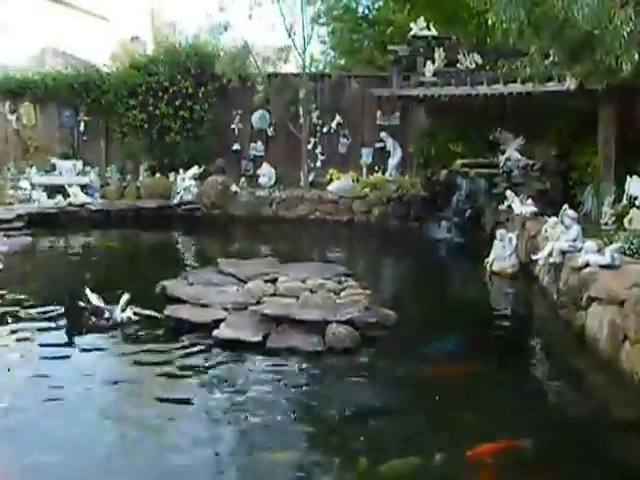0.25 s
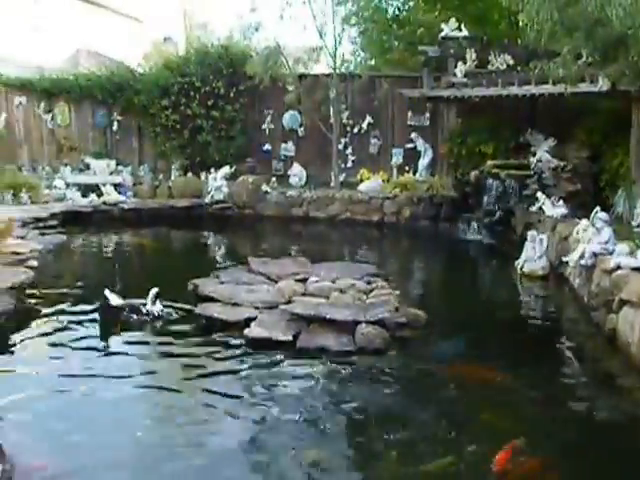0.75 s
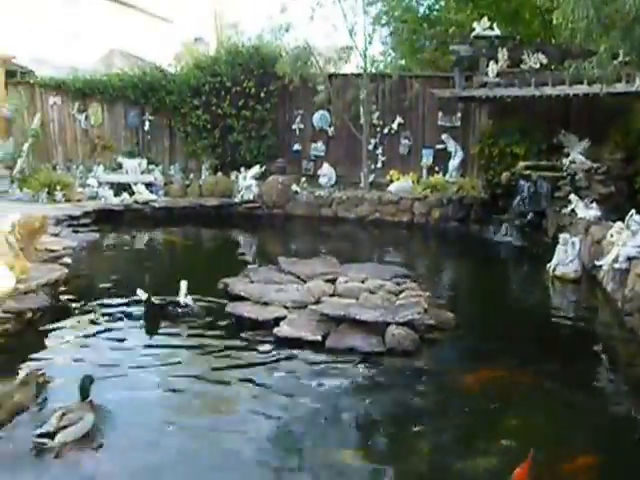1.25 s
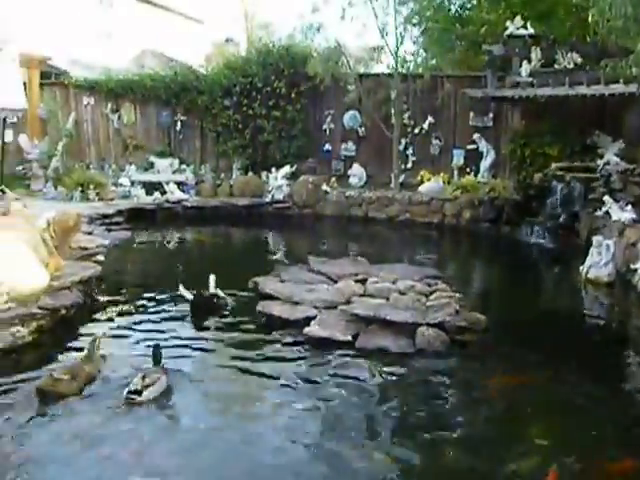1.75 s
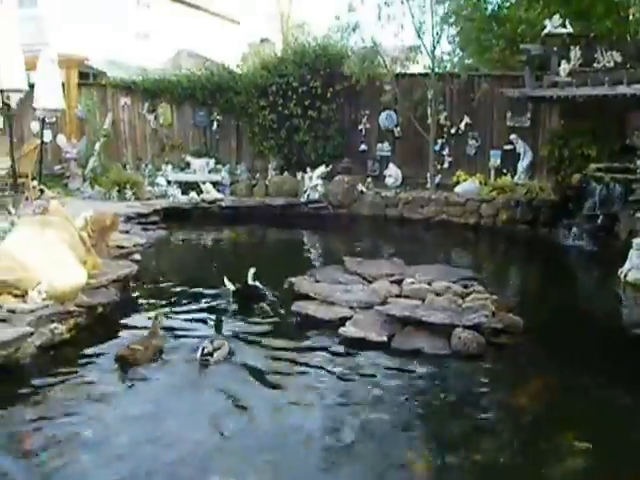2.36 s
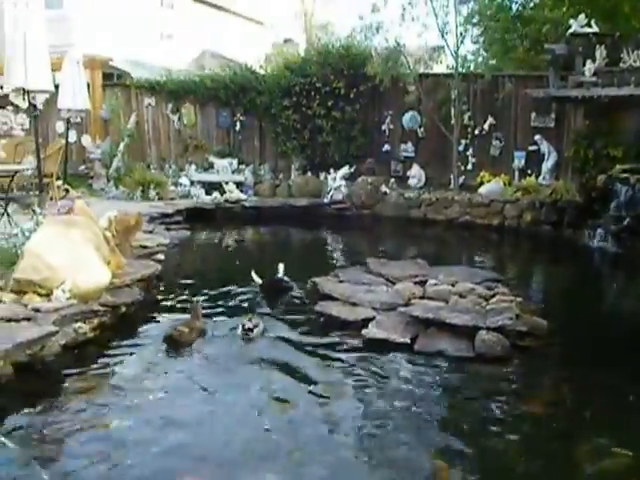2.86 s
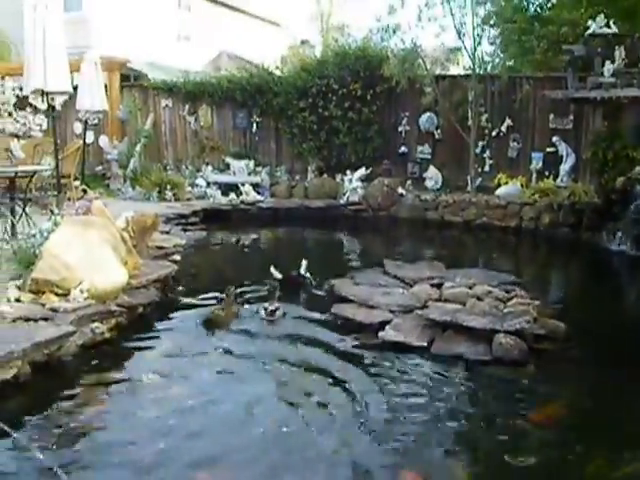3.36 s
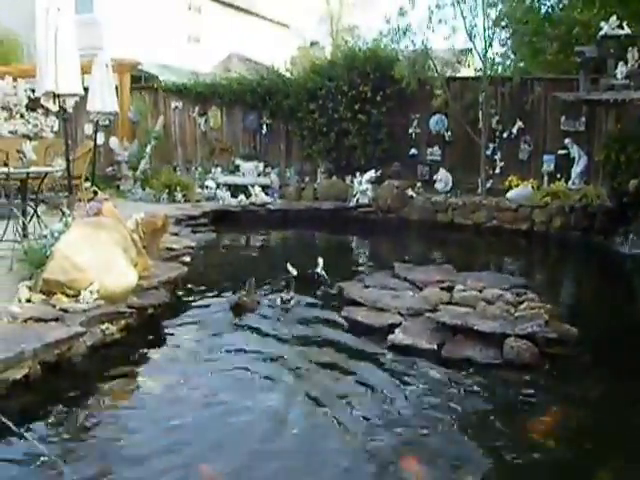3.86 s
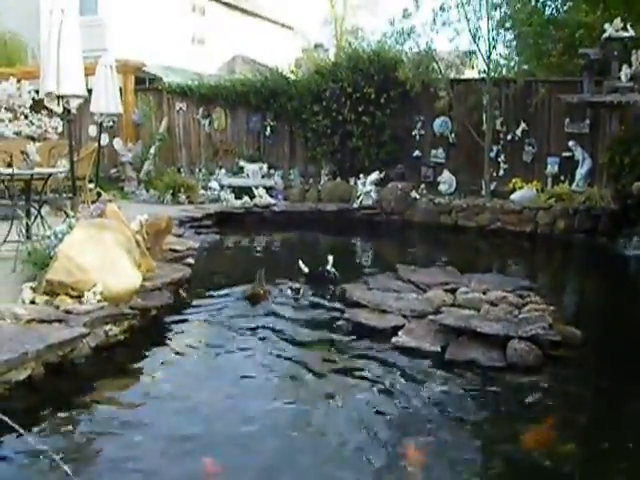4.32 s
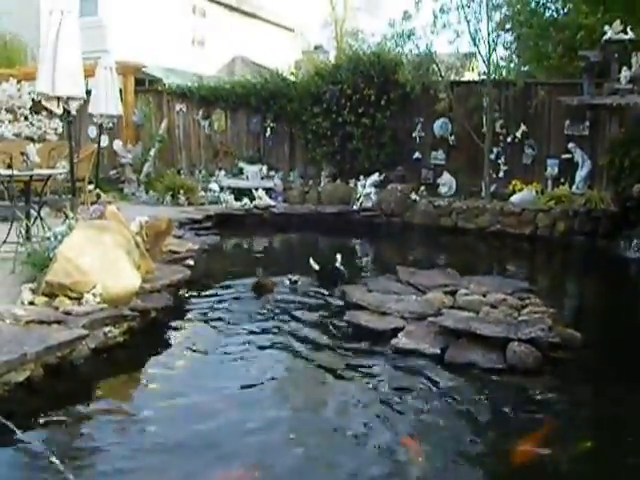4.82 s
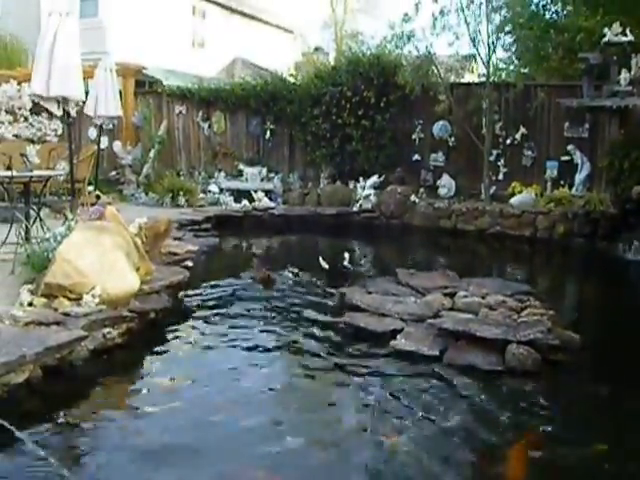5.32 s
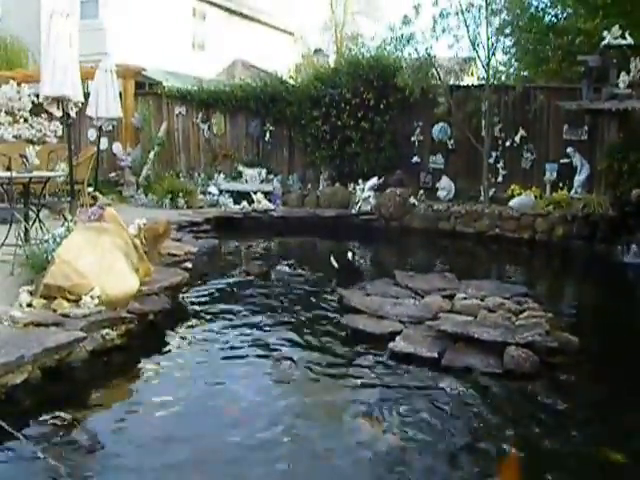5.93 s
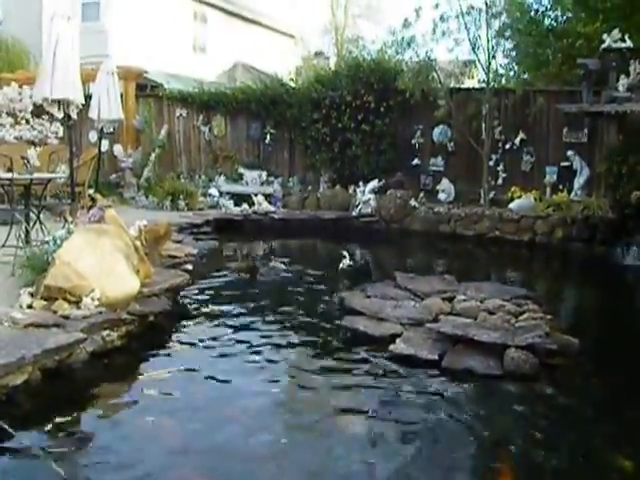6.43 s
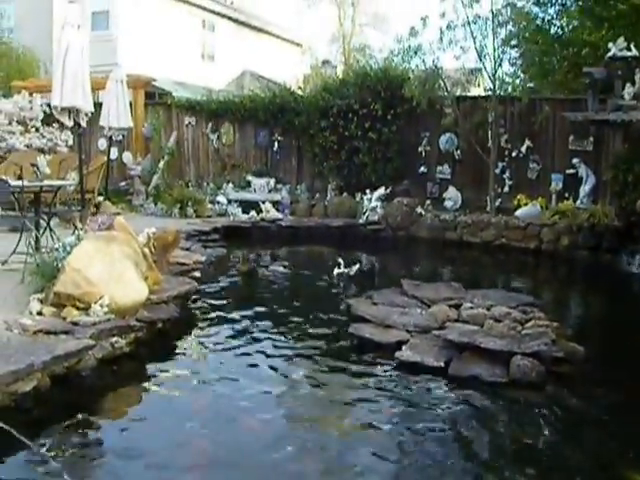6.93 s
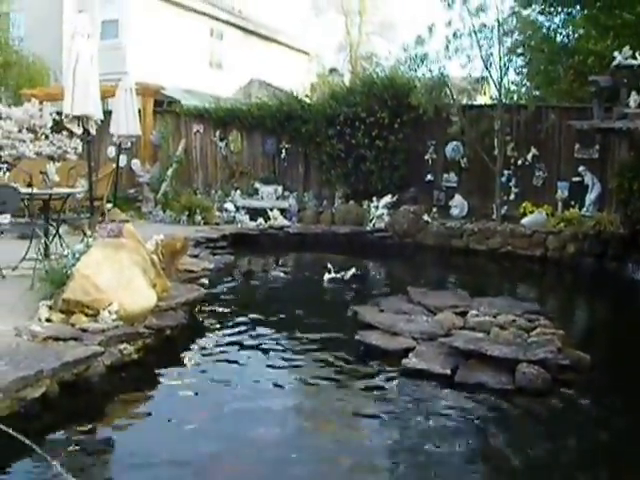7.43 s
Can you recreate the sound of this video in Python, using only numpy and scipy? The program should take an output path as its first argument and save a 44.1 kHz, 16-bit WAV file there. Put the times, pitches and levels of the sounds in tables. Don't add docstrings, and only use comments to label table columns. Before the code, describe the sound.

For about 7.7 seconds a small waterfall splashes continuously into a garden pond, heard outdoors through a small camera microphone. The water is a dense, bright wash of spray and rapid bubbling, strewn with crisp ticks, clear ringing drips and tiny high spits, plus soft low plops every few tenths of a second. It starts strongest, dips within the first quarter second, and settles slightly quieter and less fizzy after 3 seconds. A very faint low pump hum lies beneath, fading out after 5. At about 5.25 a duck quacks softly, nasal and buzzing, rising from a growl; at 6.15 a second quack is higher and more open; at 7.25 a third is rougher and broken off. A small gurgle climbs near 7.0. A barely audible distant engine drones from about 6.5. Short echoes return from stones and fence.

```python
import sys
import numpy as np
from scipy import signal
from scipy.fft import rfft, irfft
from scipy.io import wavfile
from scipy.ndimage import uniform_filter1d

SR = 44100
rng = np.random.default_rng(int(sys.argv[2]) if len(sys.argv) > 2 else 0)


def digitize_waveform(pressure):
    field = np.atleast_2d(pressure).T
    bounded = np.clip(field, -1, 1)
    quanta = np.round(bounded * 32767).astype(np.int16)
    wavfile.write(sys.argv[1], SR, quanta)


def how_loud(loudness_db):
    steps = np.asarray(loudness_db, float) / 20
    return 10 ** steps


N = 338688
YARD_DB = -12
NOTCH_HZ = 7870
LOW_TICK_DB = -12


def evened(x):
    return x / np.sqrt(np.mean(x ** 2) + 1e-20)


def steadied(x, window_s):
    width = int(window_s * SR)
    power = uniform_filter1d(uniform_filter1d(x ** 2, width), width)
    return x / np.sqrt(power)


def add(mix, start_s, sound):
    part = mix[round(start_s * SR):][:len(sound)]
    part += sound[:len(part)]


def coloured(x, points):
    hz, db = np.transpose(points)
    f = np.fft.rfftfreq(len(x), 1 / SR)
    gain = how_loud(np.interp(np.log(f + 1), np.log(hz), db))
    return irfft(rfft(x) * gain, len(x))


def wander(rate_hz, size=N):
    width = int(SR / rate_hz)
    return evened(uniform_filter1d(uniform_filter1d(rng.standard_normal(size), width), width))


def bubble(hz, cycles, rise):
    u = np.arange(int(1.9 * cycles * SR / hz)) * hz / SR
    shape = (1 - np.exp(-u / 0.38)) ** 2 * np.exp(-3 * u / cycles)
    turns = u + rise * u ** 2 / (2 * cycles)
    return shape / shape.max() * np.sin(2 * np.pi * turns)


def tick(noise, decay_s):
    burst = (noise[2:] - noise[:-2]) * np.exp(-np.arange(len(noise) - 2) / SR / decay_s)
    return burst / abs(burst).max()


def splashed(sound, noise, splash_db, decay_s):
    trail = noise ** 3 * np.exp(-np.arange(len(noise)) / SR / decay_s)
    trail *= how_loud(splash_db) / np.linalg.norm(trail)
    trail[0] = 1
    return np.convolve(sound, trail)


def nearby(x, tail_db):
    # delay_s, level_db
    stones = [
        (.0058, -26.5),
        (.0097, -24),
    ]
    yard_t60_s = 0.25
    at = np.arange(400, SR // 2, 20)
    room = np.zeros(SR // 2 + 20)
    fade = how_loud(-60 * at / SR / yard_t60_s)
    room[at + rng.integers(0, 20, len(at))] = rng.choice([-1., 1.], len(at)) * fade
    room *= how_loud(tail_db) / np.linalg.norm(room)
    room[0] = 1
    for delay_s, level_db in stones:
        room[round(delay_s * SR)] += how_loud(level_db)
    return signal.oaconvolve(x, room)[:N]


def spray(patchy_db, gust_db):
    frames = N // 64 + 5
    a, b, patches = rng.standard_normal((frames, 129, 3)).T
    patches = evened(uniform_filter1d(uniform_filter1d(patches, 12, 0), 14, 1))
    share = np.clip(np.fft.rfftfreq(256, 1 / SR)[:, None] / 3000 - .3, 0, 1)
    gusts = share * wander(120.0, size=64 * frames)[::64]
    bands = (a + 1j * b) * how_loud(patchy_db * patches + gust_db * gusts)
    return evened(signal.istft(bands, nperseg=256, noverlap=192)[1][:N])


def strikes(per_s, spread_db, clump):
    size = how_loud(spread_db * np.minimum(rng.exponential(1, N), 3.1))
    return size * (rng.random(N) < per_s / SR * clump)


def patter():
    bubbles_per_s, ticks_per_s = 1200, 300
    bubbles_db, ticks_db = -0.5, -4
    clump = np.exp(1.8 * np.tanh(0.65 * wander(110.)))
    clump /= clump.mean()
    clumped = strikes(bubbles_per_s, 7.44, clump)
    even = strikes(bubbles_per_s, 4.1, 1)
    kind = rng.integers(0, 48, N)
    pitch_hz = np.linspace(np.sqrt(300), np.sqrt(15000), 48) ** 2
    bubbles, ticks = np.zeros(N), np.zeros(N)
    for k, hz in enumerate(pitch_hz):
        one = bubble(hz, 6.3 * rng.uniform(0.59, 1.96), 0.29)
        contact = tick(rng.standard_normal(len(one) + 2), 0.00021)
        one = one + how_loud(-1.5) * min(hz / 3000, 1) * contact
        one = splashed(one, rng.standard_normal(900), splash_db=-3.5, decay_s=0.0016)
        one *= hz ** 0.24 / np.linalg.norm(one)
        size = clumped if k > 8 else even
        bubbles += signal.oaconvolve(size * (kind == k), one)[:N]
    size = strikes(ticks_per_s, 11.0, clump)
    for k in range(16):
        one = rng.standard_normal(200) * np.exp(-np.arange(200) / SR / 0.00053)
        one = signal.lfilter([1, -.5 - k / 32], [1], one)
        one = splashed(one, rng.standard_normal(900), splash_db=-8.0, decay_s=0.0074)
        ticks += signal.oaconvolve(size * (kind % 16 == k), one / np.linalg.norm(one))[:N]
    return how_loud(bubbles_db) * evened(bubbles) + how_loud(ticks_db) * evened(ticks)


def waterfall():
    # time_s, level_db
    flow = [(0.0, -24), (0.19, -26.5), (1.41, -25), (1.63, -25.5), (3.31, -27.5), (3.81, -27),
            (5.18, -27.5), (6.22, -27), (7.68, -27)]
    # pitch_hz, level_db (per Hz)
    water_colour = [(20, -29), (70, -16), (200, -26), (330, -10), (750, -3.5), (1250, -5), (2200, -2.5),
                    (4300, -2.5), (6400, 1), (7300, -0.5), (8800, -6), (13000, -14.5), (16000, -21)]
    spray_db, fizz_db, fizz_fade_db_per_s = 0.5, -6.5, -0.24
    t = np.arange(N) / SR
    level_db = np.interp(t, *np.transpose(flow))
    wash = how_loud(spray_db) * spray(patchy_db=2.13, gust_db=1.5)
    water = coloured(wash + nearby(patter(), YARD_DB), water_colour)
    rumble = signal.sosfiltfilt(signal.butter(2, 250, fs=SR, output="sos"), water)
    water = rumble + steadied(water - rumble, 0.06) * np.std(water)
    fizz = signal.sosfiltfilt(signal.butter(6, NOTCH_HZ, "high", fs=SR, output="sos"), water)
    fizz_level = how_loud(fizz_db - 1.0 + fizz_fade_db_per_s * t)
    return how_loud(level_db - 0.5) * (evened(water - fizz) + fizz_level * evened(fizz))


def hum(rows, octave_db):
    s, hz, db = np.transpose(rows)
    t = np.arange(N) / SR
    turn = 2 * np.pi * np.cumsum(np.interp(t, s, hz)) / SR
    level = np.sqrt(2) * how_loud(np.interp(t, s, db, left=-120, right=-120))
    return uniform_filter1d(level, 4000) * (np.sin(turn) + how_loud(octave_db) * np.sin(2 * turn))


def pump():
    # time_s, pitch_hz, level_db
    pump_curve = [(0., 72.5, -66.5), (2.5, 72.7, -73), (4.1, 71.7, -74.5), (5.1, 68.8, -73), (5.4, 71, -83)]
    return hum(pump_curve, octave_db=-1.5)


def strays(count, top_db, span_db, low_hz, high_hz):
    when, size, pitch = rng.random((count, 3)).T
    return list(zip(when * N / SR, top_db - span_db * size, low_hz + (high_hz - low_hz) * pitch))


def clear_drops():
    # start_s, peak_db, bubble_hz, tick_db (relative to the bubble)
    small_drops = [(0.008, -1, 6740, -23), (0.0425, -6, 6640, -18), (0.1022, -4, 6040, -14),
                   (0.1276, -6, 4670, -7), (0.559, -4, 6760, -6), (0.7205, -7.5, 6670, -4),
                   (0.8758, 0, 5530, -21), (0.9637, -2.5, 6300, -21), (1.0196, -16, 6420, -1),
                   (1.208, -1, 6800, -20), (1.309, -6, 5800, -17), (1.5926, -4.5, 6100, -18),
                   (1.7536, -7.5, 6050, -18), (1.921, -12, 7180, -10), (2.577, -3.5, 6240, -14),
                   (2.603, -2, 6500, -28), (2.7915, -0.5, 6100, -26), (3.465, -6, 6250, -25),
                   (3.736, -6, 6340, -9), (3.9893, -3, 5900, -25), (4.126, -1, 6740, -10),
                   (4.715, -6.5, 7200, 1), (4.7395, 1, 6240, -26), (5.063, -7, 5800, -13),
                   (5.38, -5, 5300, -26), (5.8928, 1.5, 6600, -21), (6.0645, -21.5, 5700, 13),
                   (6.575, -5.5, 6560, -20), (6.6835, -5.5, 6400, -21), (7.1926, -3.5, 6800, -15)]
    # start_s, peak_db, bubble_hz
    low_drops = [(0.056, -5.5, 3550), (0.1387, -7, 3300), (0.3435, -5.5, 2900), (0.7746, -11, 3130),
                 (1.0196, -5, 3220), (1.584, -10, 2950), (1.95, -14, 2900), (2.0996, -7, 4240),
                 (2.2884, -12, 4200), (2.3374, -10, 3220), (2.374, -12, 2400), (3.289, -6.5, 4740),
                 (3.4099, -5.5, 2070), (3.91, -3, 3700), (4.0167, -9, 2220), (5.1317, -9, 2760),
                 (5.256, -18, 3500), (5.376, -5.5, 3070), (5.447, -11, 2120), (5.9663, -8, 3420),
                 (6.339, -13, 2310), (6.371, -10, 3330), (6.4927, -7.5, 4920), (6.6513, -9, 4070),
                 (6.6949, -2, 3250), (7.005, -13.5, 2470), (7.174, -11, 3700), (7.447, -8, 5400),
                 (7.483, -9, 4300), (7.6126, -7, 3850)]
    # loudest_db, span_db, lowest_hz, highest_hz
    stray_range = (-6.5, 21, 4800, 7200)
    crown_ratio = (1.1, 2.25)
    crown_db = -6
    rows = small_drops + [(*row, LOW_TICK_DB) for row in low_drops + strays(28, *stray_range)]
    for s, db, hz in low_drops:
        rows.append((s, db + crown_db, hz * rng.uniform(*crown_ratio), LOW_TICK_DB))
    out = np.zeros(N)
    for s, db, hz, tick_db in rows:
        contact = tick(rng.standard_normal(200), 0.0011)
        ring = splashed(bubble(hz, 6.1, .08), rng.standard_normal(500), splash_db=-8., decay_s=0.0025)
        add(out, s + 0.00069, how_loud(db + tick_db - 1.5) * contact)
        add(out, s + .0008, how_loud(db - 1.5) * ring)
    return out


def spits():
    # start_s, peak_db, bubble_hz
    tiny_drops = [(0.0553, -13, 12700), (0.1386, -11.5, 8450), (0.45, -13.5, 8750), (0.5591, -11.5, 8800),
                  (0.8849, -15, 11000), (1.1374, -15, 9400), (1.268, -13.5, 9800), (1.5923, -17, 8460),
                  (1.7983, -13, 8700), (1.8517, -16, 9000), (1.921, -11.5, 10000), (1.9958, -16.5, 9630),
                  (2.2584, -7, 8100), (2.4059, -16, 8800), (2.4508, -17, 8600), (2.577, -13.5, 9450),
                  (2.9638, -12, 9500), (3.1797, -10, 10000), (3.909, -12, 9200), (4.1854, -16.5, 10500),
                  (4.3927, -13, 8720), (4.7144, -17, 8680), (5.1308, -16, 9300), (5.8408, -17, 9800),
                  (5.894, -9.5, 8460), (6.218, -14, 8600), (6.4971, -11.5, 8900), (6.6942, -13, 12100),
                  (7.1966, -14, 9100), (7.5448, -21, 10100)]
    # loudest_db, span_db, lowest_hz, highest_hz
    stray_range = (-17, 3, 8400, 10300)
    out = np.zeros(N)
    for s, db, hz in tiny_drops + strays(30, *stray_range):
        contact = tick(rng.standard_normal(200), 0.00071)
        contact = splashed(contact, rng.standard_normal(500), splash_db=-1.0, decay_s=0.0031)
        add(out, s + 0.00072, how_loud(db - 1.5) * contact)
        add(out, s + 0.0011, how_loud(db + 3.5) * bubble(hz, 12.5, 0.02))
    return out


def plops():
    # start_s, peak_db, bubble_hz, ring_cycles
    plop_rows = [(0.214, -20, 880, 11), (0.652, -23, 1080, 12), (0.998, -23, 1060, 8.2),
                 (1.173, -16.5, 730, 5.4), (1.802, -24, 870, 9.9), (2.085, -16.5, 1210, 4.3),
                 (2.341, -24.5, 734, 7), (2.374, -27, 865, 14), (2.886, -27, 776, 9.8),
                 (3.027, -23.5, 835, 13), (3.172, -22.5, 920, 16), (3.521, -24.5, 610, 12),
                 (3.81, -26, 850, 15), (4.11, -29, 519, 13), (4.707, -19.5, 1035, 8),
                 (4.908, -31.5, 606, 32), (5.667, -26, 880, 12), (5.92, -28.5, 895, 41),
                 (6.683, -25, 326, 2.7), (7.584, -27, 640, 5.8)]
    out = np.zeros(N)
    for s, db, hz, cycles in plop_rows:
        add(out, s, how_loud(db - 3.0) * bubble(hz, max(cycles, 2), 0.1))
    return out


def gurgle(length_s, start_hz, end_hz, db):
    size = int(length_s * SR)
    hz = np.linspace(start_hz, end_hz, size) * (1 + 0.039 * wander(250., size=size))
    level = how_loud(db + 2 * wander(300., size=size)) * signal.windows.tukey(size, .6)
    return level * np.sin(2 * np.pi * np.cumsum(hz) / SR)


def gurgles():
    # start_s, length_s, start_hz, end_hz, level_db
    gurgle_rows = [
        (0.333, 0.057, 740, 780, -32.5),
        (2.298, 0.043, 384, 765, -43),
        (6.945, 0.018, 734, 795, -35),
        (6.987, 0.028, 620, 772, -24.5),
        (6.994, 0.028, 874, 1000, -34),
        (7.0, .018, 536, 500, -40),
        (7.627, 0.075, 373, 395, -42),
    ]
    out = np.zeros(N)
    for s, *shape in gurgle_rows:
        add(out, s, gurgle(*shape))
    return out


def resonate(x, hz, width_hz):
    turn = np.exp(2j * np.pi * np.cumsum(hz * np.ones(len(x))) / SR)
    r = np.exp(-np.pi * width_hz / SR)
    return 2 * (turn * signal.lfilter([(1 - r) ** 2], [1, -2 * r, r * r], x / turn)).real


def quack(rows, pitch, voice_row, head):
    # pitch_hz, width_hz
    bill = (1712, 240)
    # pitch_hz, width_hz, level_db
    chest = [(410, 160, -28), (5200, 700, -27)]
    throat_width_hz, throat_sag_hz_per_db = 172, 2
    gape_db, gape_drop_hz = -4, 150
    rough_per_db = [.008, .045]
    s, *columns = np.transpose(rows)
    t = np.arange(s[0], s[-1], 1 / SR)
    effort_db, bill_db = (np.interp(t, s, c) for c in columns)
    top_hz, rough_top, weak_end = voice_row
    push_db = effort_db - effort_db.max()
    through = (t - s[0]) / (s[-1] - s[0])

    gape = np.clip((bill_db - gape_db) / 4.2, 0, 1)
    throat_hz = top_hz + throat_sag_hz_per_db * push_db - gape_drop_hz * gape
    rough = np.clip(rough_top - push_db * np.interp(through, [.4, .7], rough_per_db), 0, .7)
    weak = np.clip(weak_end * (through / .74) ** 3, 0, .9)

    jitter = 1 + 0.0823 * rough * wander(187.0, size=len(t))
    turns = np.cumsum(np.interp(t, *np.transpose(pitch)) * jitter) / SR
    pulses = sum(np.cos(2 * np.pi * k * turns) for k in range(1, 30))
    pulses *= 1 - weak * (.5 - .5 * np.cos(np.pi * turns))
    pulses *= how_loud(10.3 * rough * wander(250., size=len(t)))
    breath = (0.29 + np.exp(-(turns % 1) / 0.37)) * rng.standard_normal(len(t))
    drive = (1 - rough) * evened(pulses) + rough * evened(breath)

    throat = resonate(drive, throat_hz, throat_width_hz)
    voice = steadied(throat - how_loud(bill_db) * resonate(drive, *bill), 0.012)
    lead_db = .3 * push_db
    husky = drive + .6 * evened(breath)
    body = sum(how_loud(db + np.sign(f - 1500) * lead_db) * resonate(husky, f, w) for f, w, db in chest + head)
    call = how_loud(effort_db) * (voice + body / np.std(throat))
    return s[0], call * signal.windows.tukey(len(t), .1)


def duck():
    # time_s, effort_db, bill_opening_db
    efforts = [
        [(5.225, -41, -14), (5.262, -31, -28), (5.285, -29, -11), (5.307, -26, -8), (5.345, -23, -13),
         (5.38, -19, -11), (5.445, -25, -1), (5.485, -43, -4), (5.55, -52, -4)],
        [(6.115, -37, -17), (6.135, -34.5, -29), (6.205, -27, -19), (6.232, -22, -13), (6.285, -19.5, -15),
         (6.308, -22.5, 0), (6.344, -20.5, 7), (6.368, -27.5, -3), (6.46, -41, -0.5)],
        [(7.228, -35.5, -16), (7.255, -32.5, -28), (7.33, -24.5, -11), (7.375, -21, -10), (7.418, -29, -20),
         (7.445, -25, -25), (7.49, -23.5, -19), (7.502, -35.5, -14), (7.58, -59, -8)],
    ]
    # time_s, pitch_hz
    pitches = [
        [(5.23, 140), (5.283, 154), (5.307, 186), (5.345, 191.5), (5.382, 198), (5.42, 198.5), (5.44, 195.5)],
        [(6.12, 134), (6.165, 145), (6.216, 181), (6.232, 207), (6.3, 212.4), (6.345, 212), (6.44, 211)],
        [(7.24, 143), (7.28, 153), (7.33, 206), (7.41, 199), (7.43, 214), (7.5, 220)],
    ]
    # throat_hz, roughness at full effort (0-1), alternate-pulse weakening at the end (0-1)
    voices = [(1390, .09, .2), (1445, .05, .3), (1395, .14, .8)]
    # pitch_hz, width_hz, level_db
    heads = [
        [(746, 190, -19.5), (4190, 230, -18)],
        [(727, 200, -21), (2420, 420, -21.5)],
        [(680, 370, -24.5), (2230, 270, -28)],
    ]
    out = np.zeros(N)
    for call in zip(efforts, pitches, voices, heads):
        add(out, *quack(*call))
    return out


def far_engine():
    # time_s, pitch_hz, level_db
    engine_curve = [
        (6.45, 153.9, -85),
        (6.614, 155.3, -68.5),
        (7.4, 161.5, -68),
    ]
    return hum(engine_curve, octave_db=-30.)


def scene():
    duck_yard_db, bass_cut_hz = -7, 310
    pond = clear_drops() + spits() + plops() + gurgles()
    close = nearby(pond, YARD_DB) + how_loud(4.5) * nearby(duck(), duck_yard_db)
    close = signal.sosfilt(signal.butter(5, bass_cut_hz, "high", fs=SR, output="sos"), close)
    return (waterfall() + close + pump() + far_engine())[None]


def band_limit(x):
    return signal.sosfilt(signal.butter(12, 16670, fs=SR, output="sos"), x)


def record(dry):
    notch_width_hz, edge_hz = 760, 15750
    notched = signal.lfilter(*signal.iirnotch(NOTCH_HZ, NOTCH_HZ / notch_width_hz, SR), dry)
    f = np.fft.rfftfreq(N, 1 / SR)
    top = how_loud(np.interp(f, [edge_hz, edge_hz + 90], [0, -60]))
    return band_limit(irfft(rfft(notched) * top, N))


dry = scene()
out = record(dry)
digitize_waveform(out)
```